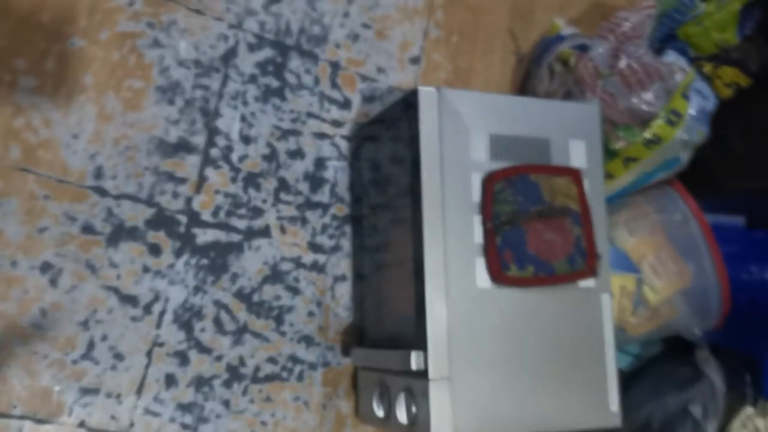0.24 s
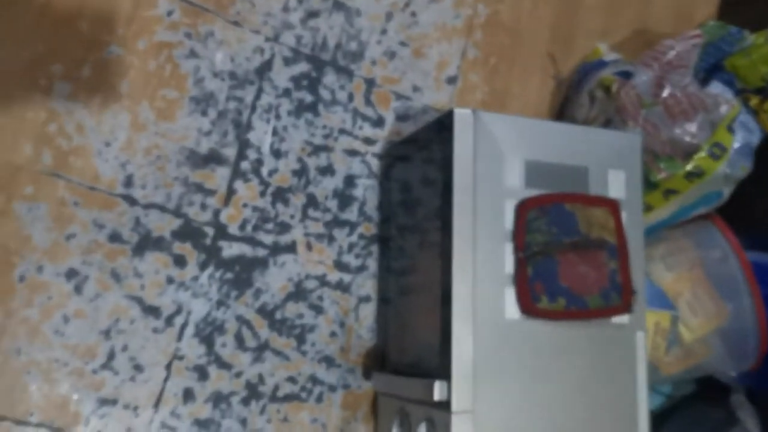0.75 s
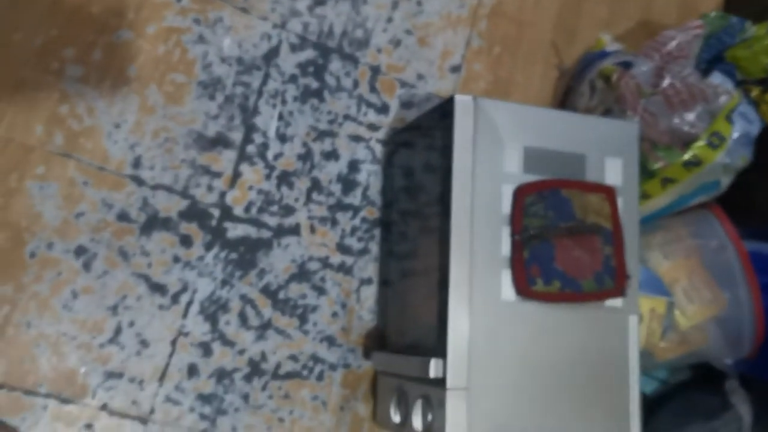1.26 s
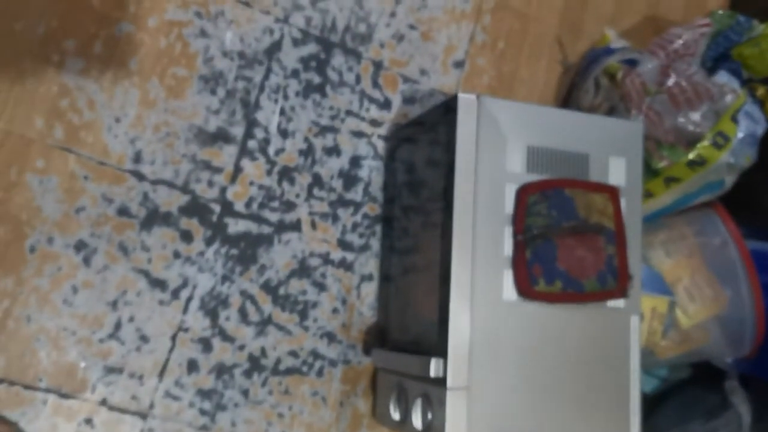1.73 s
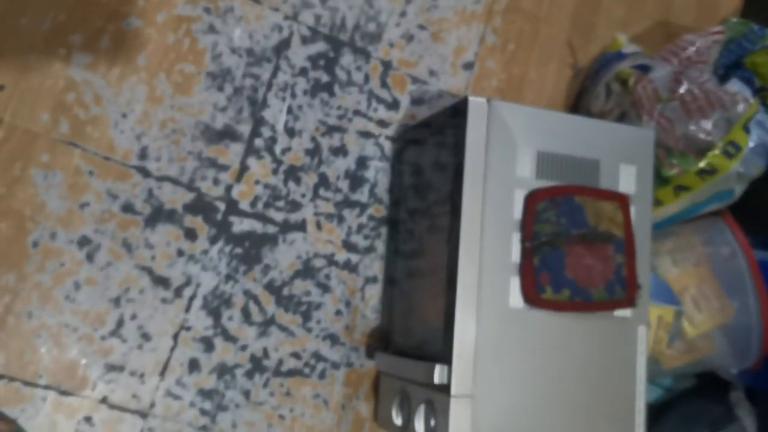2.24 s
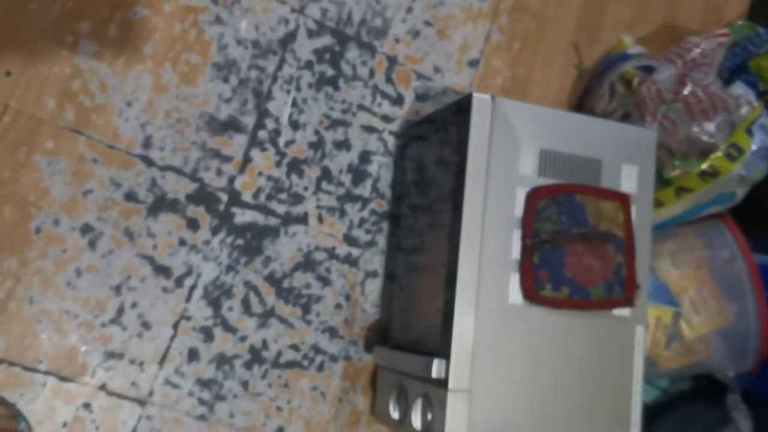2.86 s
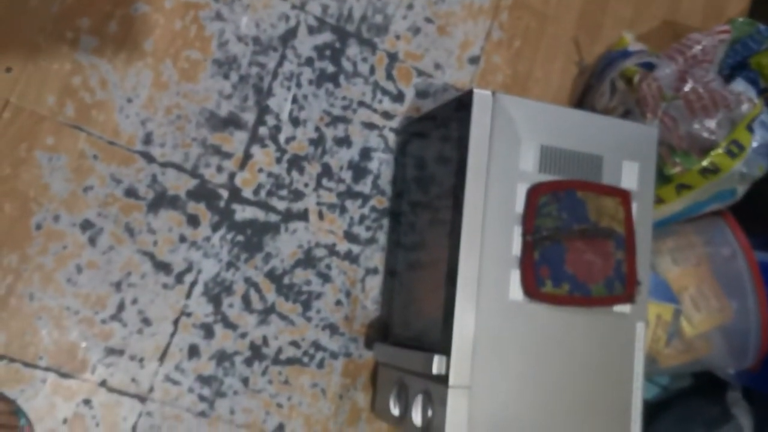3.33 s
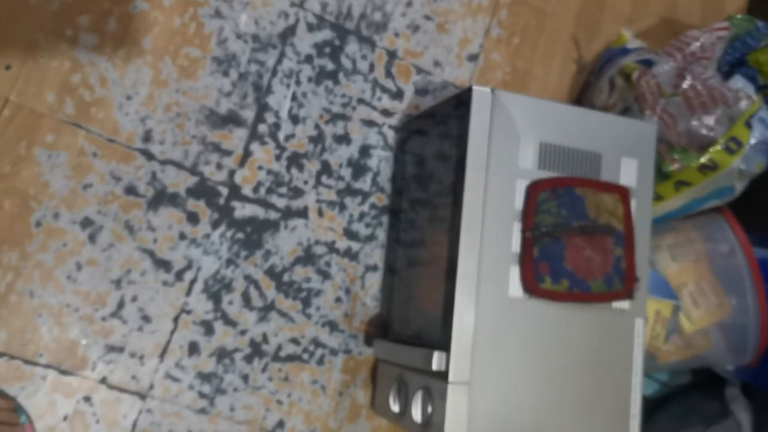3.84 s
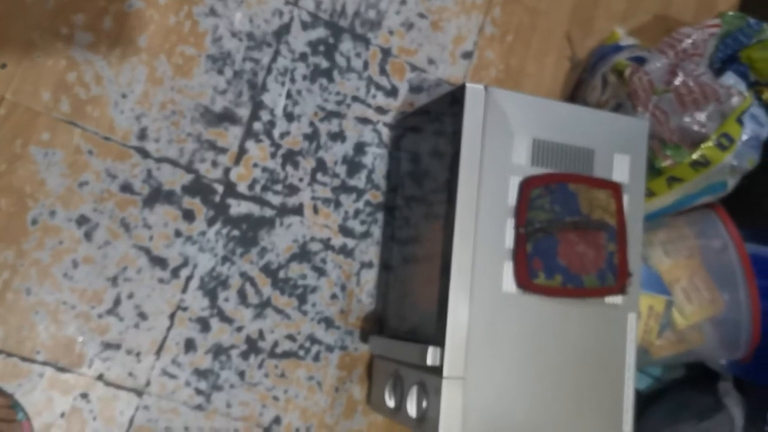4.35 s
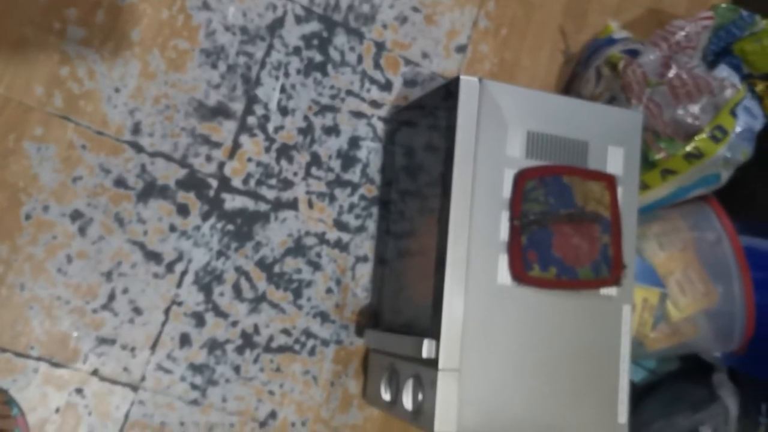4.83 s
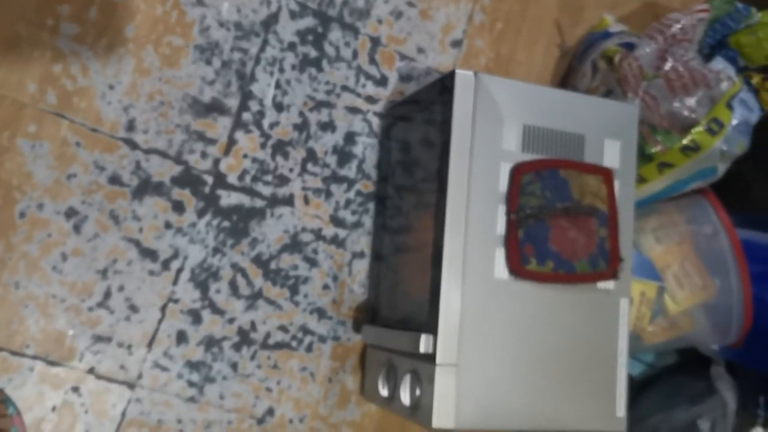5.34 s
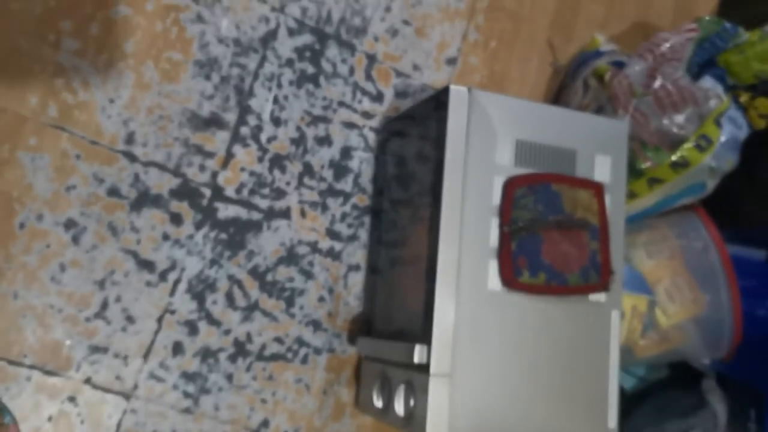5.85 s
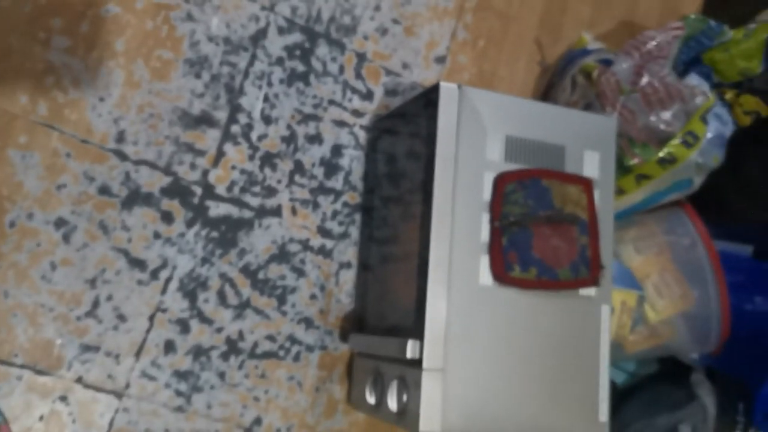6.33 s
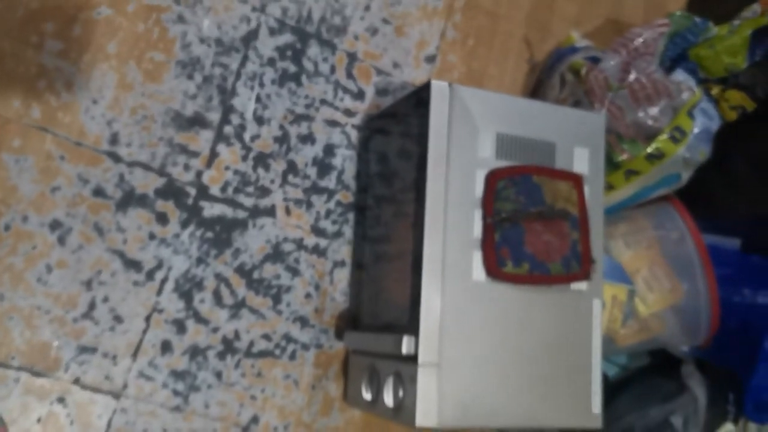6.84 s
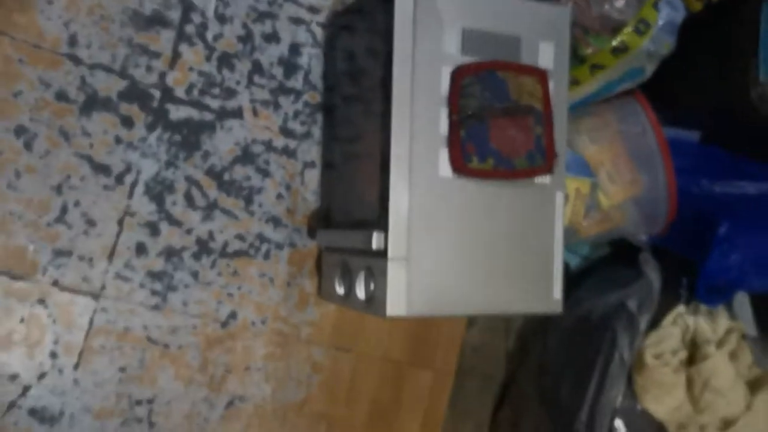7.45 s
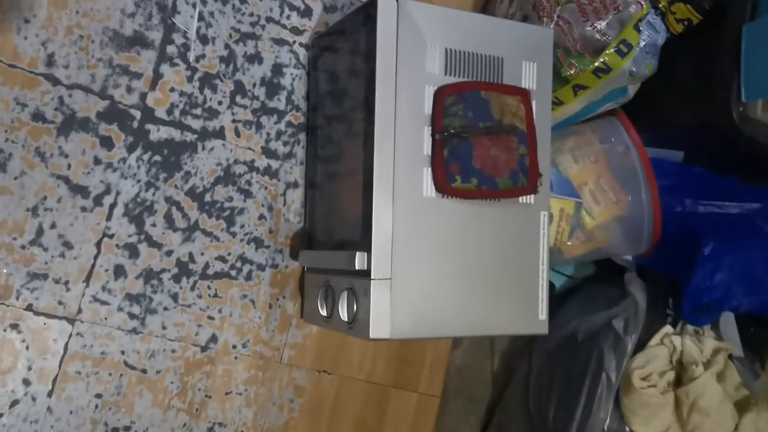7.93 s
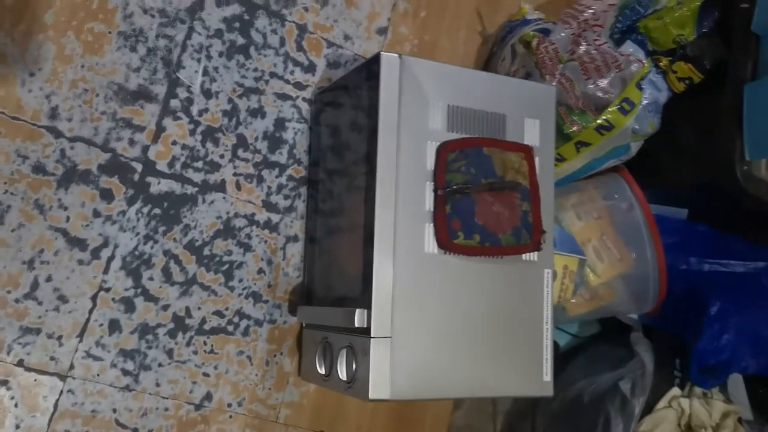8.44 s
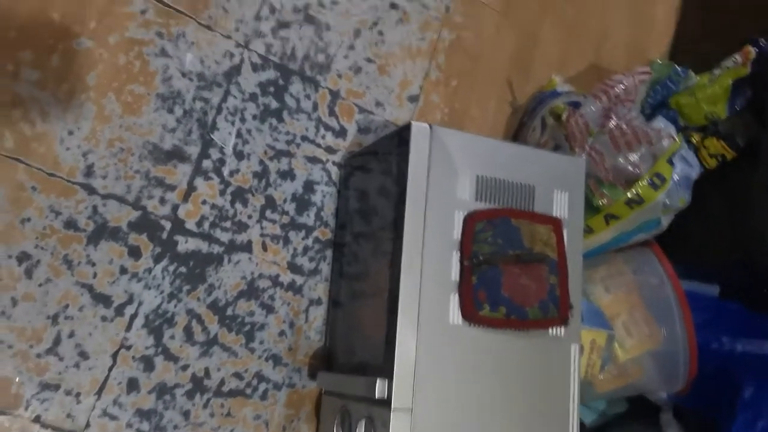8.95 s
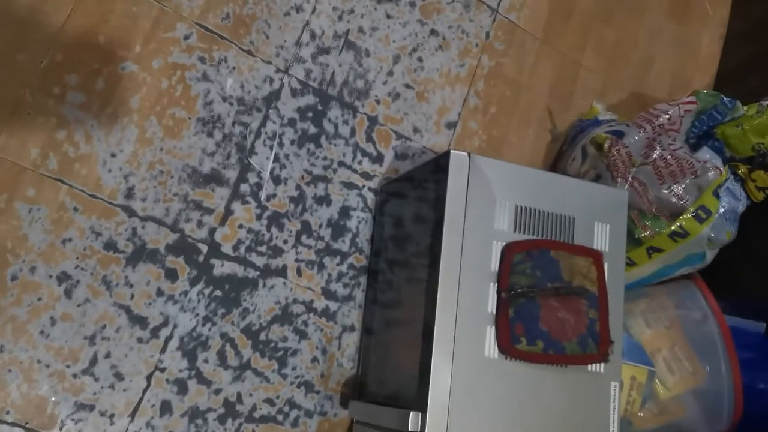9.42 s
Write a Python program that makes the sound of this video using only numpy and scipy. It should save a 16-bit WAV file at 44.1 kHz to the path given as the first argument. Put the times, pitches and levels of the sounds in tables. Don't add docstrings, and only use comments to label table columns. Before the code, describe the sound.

Continuous electrical hum and breathy vent noise from a microwave on a tiled floor, heard close on a drifting handheld stereo microphone. Soles scuff and chirp faintly at first, then high clock-like ticks begin over dull rolling knocks from the turntable. A soft thud comes near four seconds, a firmer one past six, and a sharp crackling snap around eight and a half.

```python
import sys
import numpy as np
from scipy import signal
from scipy.fft import rfft, irfft, next_fast_len
from scipy.io import wavfile
from scipy.ndimage import uniform_filter1d, map_coordinates

SR = 44100
rng = np.random.default_rng(int(sys.argv[2]) if len(sys.argv) > 2 else 0)


def persist_wave(psi):
    counts = np.round(np.clip(psi, -1, 1) * 32767).astype(np.int16)
    wavfile.write(sys.argv[1], SR, np.atleast_2d(counts).T)


def volts_from_db(level):
    exponent = np.asarray(level, float) / 20
    return 10 ** exponent


N = 426888

# (frequency [Hz], level [dB])
FAN_SHAFTS = [
    (57.04, -75),
    (58.79, -73),
    (117.58, -74),
]
# (frequency [Hz], density [dB per Hz])
CABINET_AIR = [(20, -10.5), (80, -8), (150, -4), (220, 4.5), (340, -0.5), (450, -0.5), (700, -4.5),
               (1050, -3.5), (1450, -14), (2200, -39)]
# (frequency [Hz], density [dB per Hz])
VENT_AIR = [(700, -16.5), (1300, -4), (1600, -1.5), (2300, 0.5), (2900, -2), (3300, -4.5), (4800, -6.5),
            (5900, -24), (8000, -23)]
# (frequency [Hz], correlation [-1 to 1])
PORT_CORRELATION = [(30, .4), (85, .6), (150, .8), (210, .92), (450, .82), (630, .4), (800, -.2),
                    (1100, -.3), (1500, 0), (16000, 0)]
# (time [s], level [dB])
THUDS = [
    (3.95, -35),
    (6.395, -33),
]
# (time [s], level [dB], low part [dB], rise [s], t60 [s])
SCUFFS = [
    (.213, -65.5, 1, 0.0078, 0.26),
    (.399, -61.5, -3, 0.012, 0.38),
    (1.195, -62.5, -2, 0.0036, 0.25),
    (1.71, -66, 4, .01, 0.27),
    (8.467, -66.5, -17, .02, 0.46),
    (8.51, -63.5, -3, .012, 0.29),
    (8.683, -74, 10.5, .003, 0.25),
]
# (time [s], length [s], frequency [Hz], level [dB])
SQUEAKS = [
    (.648, .044, 7080, -58.5),
    (.697, .028, 7150, -59),
    (.693, .028, 6050, -59),
]
# (time [s], level [dB], ring frequency [Hz], top level [dB])
SNAPS = [(8.468, -42, 6900, -20), (8.500, -46, 6500, -8), (8.511, -43, 5500, -4), (8.518, -40, 8000, -3),
         (8.532, -41, 7700, -10), (8.5246, -35, 1950, -14), (8.5261, -28.5, 5000, -16),
         (8.5262, -35, 7900, -30), (8.5266, -32, 2000, -30), (8.6798, -27, 2650, -40),
         (8.680, -27.5, 4300, -40), (8.6804, -39, 7900, -30), (8.6877, -36, 5600, -30)]
# (frequency [Hz], width [Hz], level [dB])
PLATE_MODES = [(535, 50, 10), (794, 99, 6), (940, 81, 6), (1090, 150, -9)]
KNOCK_DB = [-64, -60, -44, -50, -47, -48, -48, -54, -44.5, -48, -45, -43, -47, -44.5, -44.5, -46, -45.5,
            -46]
TURN_DB = [-47.5, -50, -49.5, -49.5, -51, -50, -49, -51.5]
# (delay [s], level [dB], low part [dB], t60 [s])
GEAR_TEETH = [
    (0, 0, 2, 0.28),
    (.333, -11, 6, .2),
    (.452, -5.5, 4, .2),
]
# (multiple of the mains, left level [dB], right level [dB], left lead [rad])
HUM = [(2, -65, -62, .4), (3, -54.5, -57, .1), (4, 1.2, -1.3, -.05), (5, 0, .2, -.45), (6, -.8, .8, .1),
       (7, -69, -73, .2), (8, -54.5, -60, -.3), (9, -55.5, -57.5, .25), (11, -70, -77, 3),
       (12, -68, -79, 3), (13, -68, -74, 1), (17, -76, -71, 1), (30, -78, -78, 0)]
# (time [s], 4th multiple level [dB], 5th multiple level [dB])
STANDING_WAVES = [(0, -45, -59.5), (.4, -45.5, -60.5), (.8, -41, -62), (1.15, -43, -60), (1.6, -40, -60),
                  (2.6, -40, -60.5), (3.3, -39.5, -62), (4.15, -41, -65), (4.6, -44.5, -60),
                  (4.85, -43.5, -70), (5.15, -48, -66), (5.5, -44.5, -61), (6.3, -46, -57),
                  (7.2, -45, -52.5), (8.1, -44.5, -54), (8.45, -41, -55), (9.4, -39.5, -55),
                  (9.68, -39, -56.5)]
# (frequency [Hz], gain [dB])
LEFT_PORT = [(100, 0), (450, 0.5), (800, 2), (2300, 0), (4800, -3.5), (5900, -4.5), (7000, 2), (7800, 3),
             (8600, -8), (9550, -27.5), (9800, -43), (12000, -38), (15600, -25)]
# (frequency [Hz], gain [dB])
RIGHT_PORT = [(100, 1), (450, -6), (800, 0), (2300, -1.5), (4800, -2), (5900, -11.5), (6900, -8),
              (7900, -32), (9000, -7), (10400, 5), (11500, -1), (13000, -8), (14500, -15), (15600, -27)]
# (frequency [Hz], density [dB per Hz])
SELF_NOISE = [(5000, -39), (9000, 4), (11500, -17), (14500, -10), (15700, 16)]

MAINS_HZ = 59.984
GEAR_START_S, GEAR_TURN_S = 1.6955, 1.0814
ROLL_START_S, ROLL_GAP_S = .257, .5395


def unit(x):
    return x / np.sqrt(np.mean(x ** 2) + 1e-20)


def along(points, hz):
    f, v = np.transpose(points)
    return np.interp(np.log(hz + 1), np.log(f + 1), v)


def curves(rows):
    s, *columns = np.transpose(rows)
    t = np.arange(N) / SR
    return [np.interp(t, s, column) for column in columns]


def wobble(rate):
    coarse = np.arange(0, N + 32, 32)
    knots = rng.standard_normal(int(N * rate / SR) + 4)
    return np.interp(np.arange(N), coarse, map_coordinates(knots, [coarse * rate / SR]))


def filtered(x, response):
    m = next_fast_len(N + SR // 2)
    return irfft(rfft(x, m) * response(np.fft.rfftfreq(m, 1 / SR)), m)[..., :N]


def band(x, lo_hz, hi_hz):
    sos = signal.butter(2, [lo_hz, min(hi_hz, SR / 2.1)], "band", fs=SR, output="sos")
    return signal.sosfilt(sos, x)


def resonances(modes):
    def response(f):
        return sum((-1) ** k * volts_from_db(db) * 1j * f * width / (hz * hz - f * f + 1j * f * width)
                   for k, (hz, width, db) in enumerate(modes))
    return response


def add(track, s, rise, t60, size):
    part = track[round(s * SR):][:SR // 2]
    t = np.arange(len(part)) / SR
    swell = 1 - np.exp(-t / max(rise, 1e-4))
    part += size * swell * volts_from_db(-60 * t / max(t60, .002))


def sizzle(rows, top_db, lo_hz, hi_hz):
    top, low = np.zeros(N), np.zeros(N)
    for s, db, low_db, rise, t60 in rows:
        add(top, s, rise, t60, volts_from_db(db + top_db))
        add(low, s, rise, t60, volts_from_db(db + top_db + low_db))
    noise = rng.standard_normal((2, 2, N))
    bright = top * unit(band(noise[0], lo_hz, hi_hz))
    return bright + low * unit(band(noise[1], 910, 5800))


def rush(spectrum, patchy_db):
    z = signal.stft(rng.standard_normal((2, N + 512)), nperseg=512)[2]
    patches = uniform_filter1d(rng.standard_normal(z.shape[1:]), size=8, axis=0)
    patches = unit(uniform_filter1d(patches, size=10, axis=1))
    pair = signal.istft(z * volts_from_db(patchy_db * patches), nperseg=512)[1][:, :N]

    def mid_side(hz):
        angle = np.arccos(np.clip(along(PORT_CORRELATION, hz), -1, 1)) / 2
        return volts_from_db(along(spectrum, hz)) * [np.cos(angle), np.sin(angle)]

    mid, side = filtered(pair, mid_side)
    return unit(np.array([mid + side, mid - side]))


def fan():
    t = np.arange(N) / SR - .25
    shaft = np.zeros(N)
    for hz, db in FAN_SHAFTS:
        level = volts_from_db(db + 1.2 * wobble(2.22)) * np.sqrt(2)
        shaft += level * np.sin(2 * np.pi * hz * t + .25 * wobble(1.57))
    body_level = volts_from_db(-50.5 + 0.17 * wobble(1.4) + 0.37 * wobble(4))
    vent_level = volts_from_db(-55 + 0.24 * wobble(1.33) + 0.087 * wobble(5))
    hiss_level = volts_from_db(-60 + 0.57 * wobble(1.82) + 0.37 * wobble(6.2))
    body = body_level * rush(CABINET_AIR, patchy_db=1.1)
    vent = vent_level * rush(VENT_AIR, patchy_db=0.58)
    hiss = hiss_level * rush([(3500, -32), (5200, 2.5), (16000, -4.5)], patchy_db=0.5)
    return shaft + body + vent + hiss


def feet():
    t, thud, squeak = np.arange(N) / SR, np.zeros(N), np.zeros(N)
    for s, db in THUDS:
        add(thud, s, .006, .09, volts_from_db(db))
    floor = sum(gain * np.sin(2 * np.pi * hz * t) for hz, gain in [(205, 1), (165, 0.49), (95, 0.17)])
    tremble_db, waver = 2.5 * wobble(153), .4 * wobble(200)
    for s, length, hz, db in SQUEAKS:
        arch = np.sin(np.pi * np.clip((t - s) / length, 0, 1)) ** .5
        squeak += volts_from_db(db + tremble_db) * arch * np.sin(2 * np.pi * hz * t + waver)
    scuffs = sizzle(SCUFFS, top_db=14.5, lo_hz=4800, hi_hz=16000)
    return scuffs + thud * floor + squeak * volts_from_db([[-3], [0]])


def snaps():
    out, t = np.zeros((2, N)), np.arange(SR // 50) / SR
    for s, db, hz, top_db in SNAPS:
        t60 = 6 / hz + .0016
        ring = volts_from_db(-60 * t / t60) * (1 - np.exp(-t / .00012)) * np.sin(2 * np.pi * hz * t)
        noise = band(rng.standard_normal((2, len(t))), 10700, 14000)
        spray = volts_from_db(top_db + 6.5 - 60 * t / 0.0099) * noise
        rings = [ring, volts_from_db(-2.0) * np.roll(ring, 9)]
        out[:, round(s * SR):][:, :len(t)] += volts_from_db(db) * (rings + volts_from_db([[19], [-3]]) * spray)
    return out


def turntable():
    rub, bump = np.zeros(N), np.zeros(N)
    for k, db in enumerate(KNOCK_DB):
        s = ROLL_START_S + k * ROLL_GAP_S
        add(rub, s, .016, .16, volts_from_db(db + 3.0))
        bump[round((s + .008) * SR)] = volts_from_db(db + 26)
    plate = resonances(PLATE_MODES)
    scrape = rub * unit(filtered(rng.standard_normal((2, N)), plate))
    knock = filtered(bump, plate) * [[1], [.4]]
    return (scrape + knock) * volts_from_db([[2], [-1.5]])


def timer():
    clicks, tails = [], []
    for k, turn_db in enumerate(TURN_DB):
        for delay, tooth_db, low_db, t60 in GEAR_TEETH:
            s, db = GEAR_START_S + k * GEAR_TURN_S + delay, turn_db + tooth_db
            clicks.append((s, db + 2.5, low_db - 2, .0006, .035))
            tails.append((s, db, low_db, .004, t60))
    ticks = sizzle(clicks + tails, top_db=-4.5, lo_hz=7600, hi_hz=13700)
    return volts_from_db([[-1.5], [0]]) * ticks


def buzz(turn):
    cycle, k = np.linspace(0, 2 * np.pi, 2048), np.arange(20, 84, 2)[:, None]
    size_db = rng.normal(0, 3, (2, *k.shape))
    start = rng.uniform(0, 2 * np.pi, (2, *k.shape))
    shape = np.sum(volts_from_db(size_db - 0.14 * k) * np.sin(k * cycle + start), axis=1)
    sides = [np.interp(turn % (2 * np.pi), cycle, side) for side in shape]
    return volts_from_db([[-77], [-80]]) * np.array(sides)


def transformer():
    fourth_db, fifth_db = curves(STANDING_WAVES)
    sixth_db = -49 + 0.1 * (fourth_db - fourth_db.mean()) + 0.17 * (fifth_db - fifth_db.mean())
    place_db = {4: fourth_db, 5: fifth_db, 6: sixth_db}
    turn = 2 * np.pi * MAINS_HZ * np.arange(N) / SR + 0.042 * wobble(0.99)
    out = buzz(turn)
    for k, left_db, right_db, lead in HUM:
        level = volts_from_db(place_db.get(k, 0) + 0.6 * wobble(2.47)) * np.sqrt(2)
        phase = k * turn + rng.uniform(0, 2 * np.pi) + np.array([[lead / 2], [-lead / 2]])
        out += level * volts_from_db([[left_db], [right_db]]) * np.sin(phase)
    return out


def ports(x):
    return filtered(x, lambda hz: volts_from_db([along(LEFT_PORT, hz), along(RIGHT_PORT, hz)]))


def scene():
    return transformer() + ports(fan() + feet() + snaps() + turntable() + timer())


def band_limit(x):
    return signal.sosfilt(signal.butter(12, 15720, fs=SR, output="sos"), x)


def record(dry):
    noise = rng.standard_normal((2, N))
    hiss = unit(filtered(noise, lambda hz: volts_from_db(along(SELF_NOISE, hz))))
    return band_limit(dry + volts_from_db([[-88], [-94]]) * hiss)


dry = scene()
out = record(dry)
persist_wave(out)
```